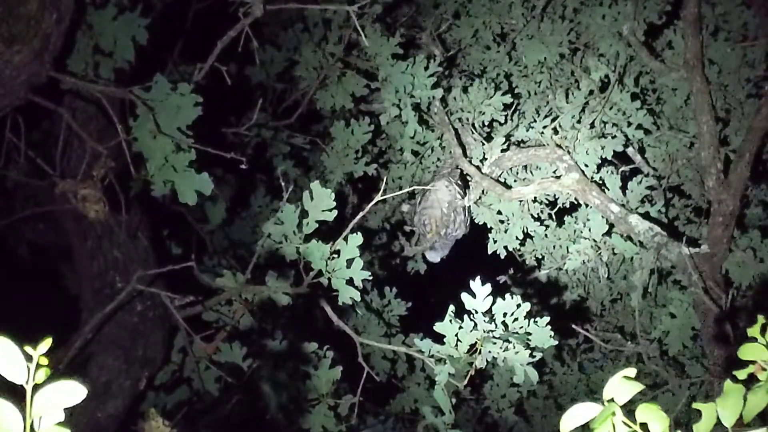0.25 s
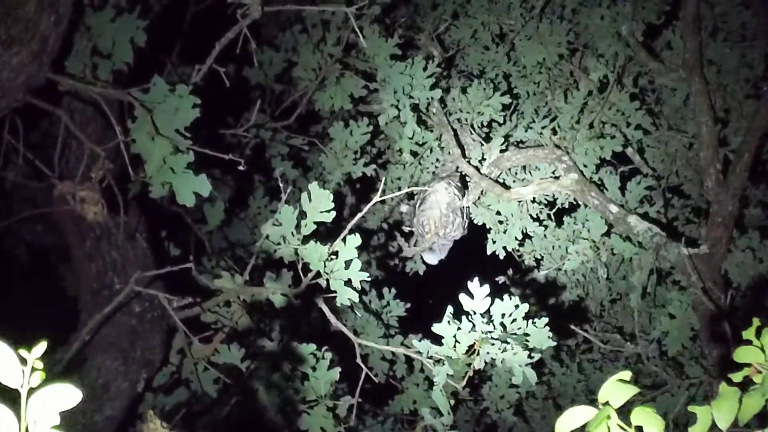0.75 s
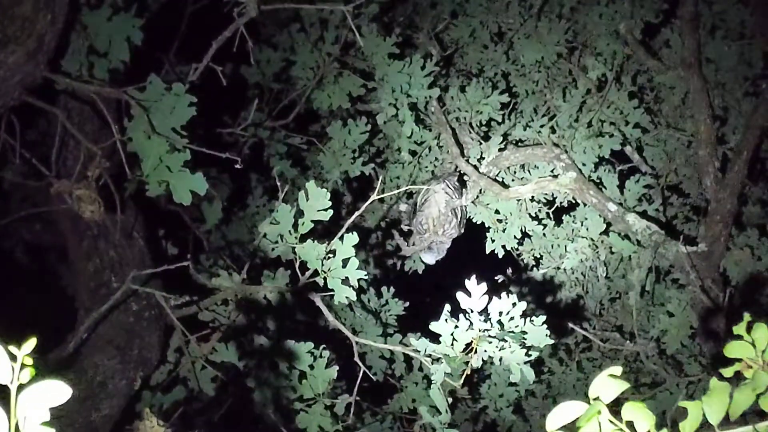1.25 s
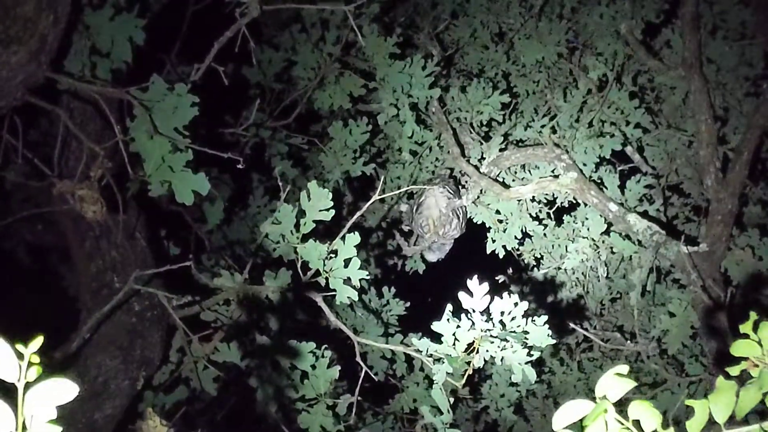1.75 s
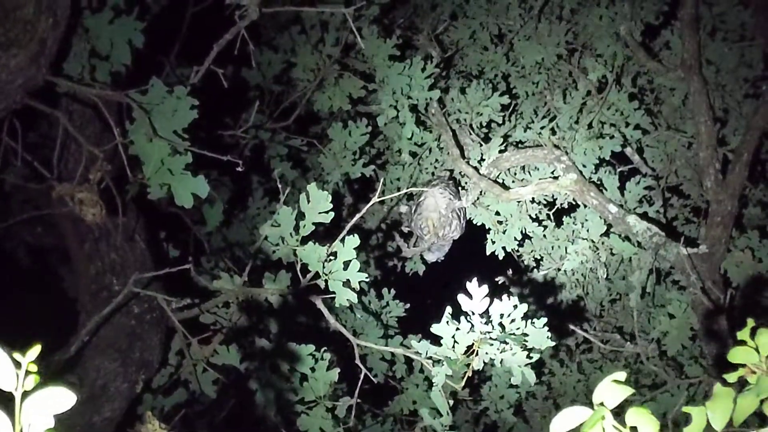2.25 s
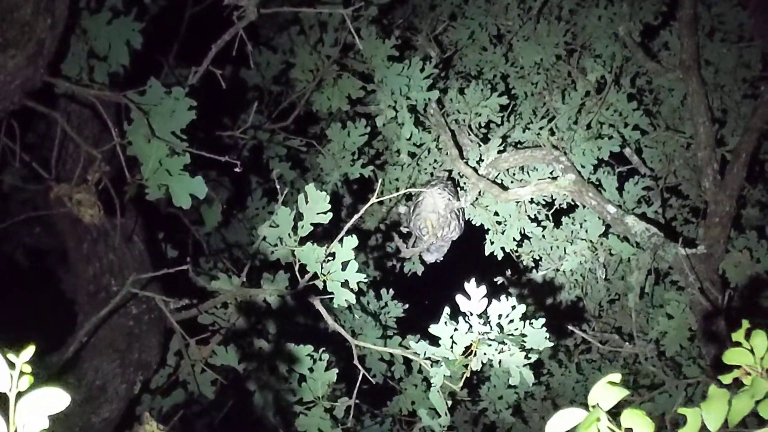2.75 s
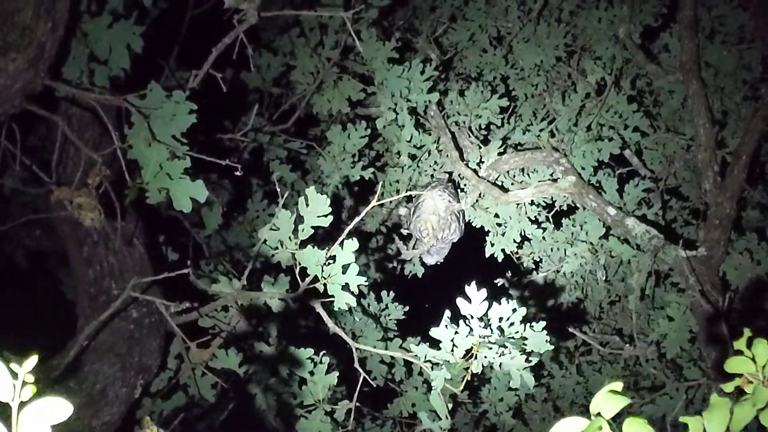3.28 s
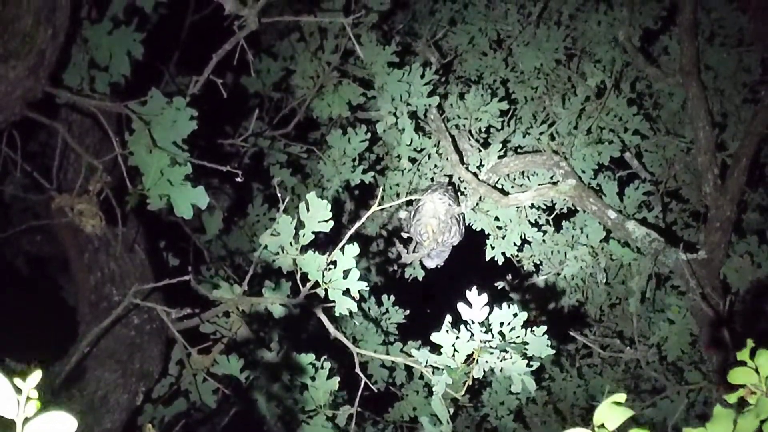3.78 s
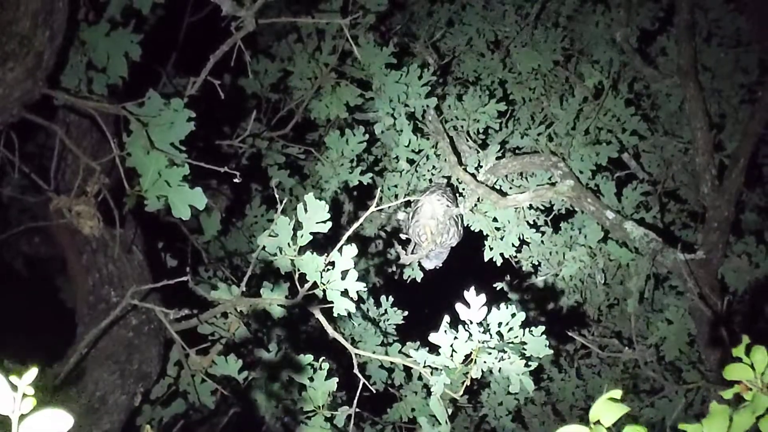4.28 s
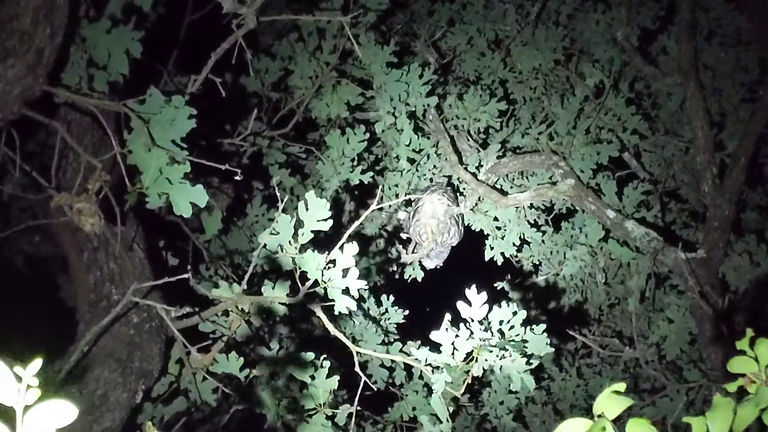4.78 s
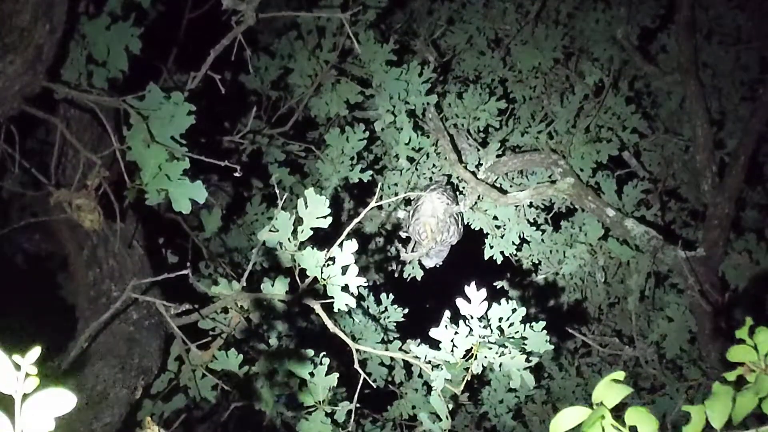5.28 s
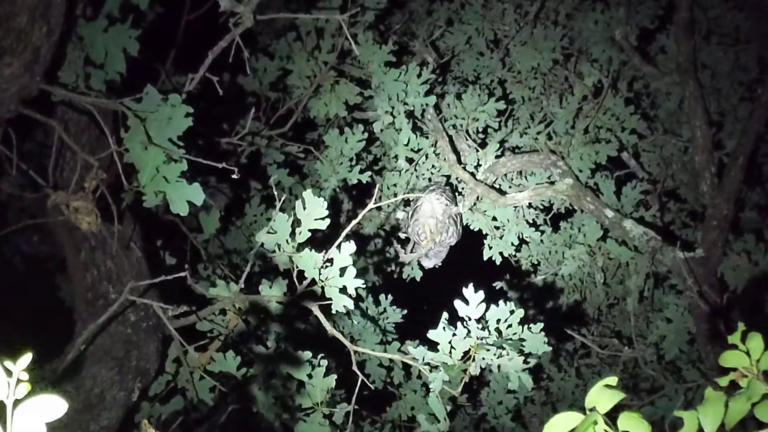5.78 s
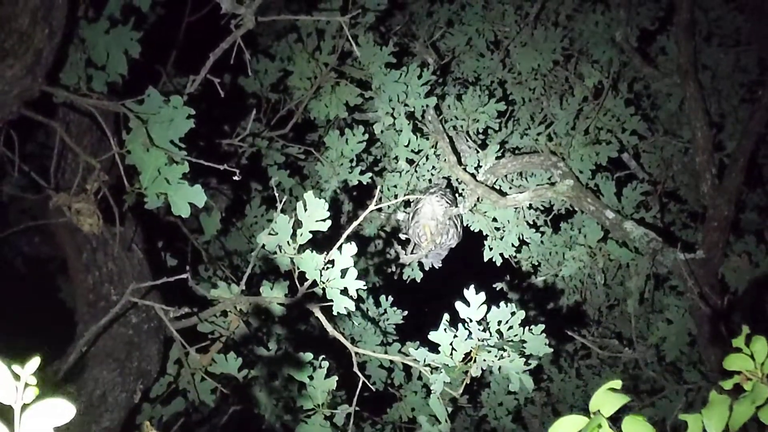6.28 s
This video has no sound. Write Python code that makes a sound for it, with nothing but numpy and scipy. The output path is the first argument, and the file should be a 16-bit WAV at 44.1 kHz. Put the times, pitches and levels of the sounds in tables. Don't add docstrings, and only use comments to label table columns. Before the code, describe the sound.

An owl gives three short hoots and one long hoot that breaks high and slides down, over steady night crickets in woods.

```python
import sys
import numpy as np
from scipy import signal
from scipy.fft import rfft, irfft, next_fast_len
from scipy.io import wavfile
from scipy.ndimage import uniform_filter1d, map_coordinates

SR = 44100
rng = np.random.default_rng(int(sys.argv[2]) if len(sys.argv) > 2 else 0)


def dump(signal):
    limited = np.clip(np.atleast_2d(signal).T, -1, 1)
    pcm = np.round(limited * 32767).astype(np.int16)
    wavfile.write(sys.argv[1], SR, pcm)


def boost_factor(decibels):
    exponent = np.asarray(decibels, float) / 20
    return 10 ** exponent


N = 287973
TIME = np.arange(N) / SR

# [t/s, chest part/s, high hold/s, top f/Hz, level/dB]
HOOTS = [
    (0.061, 0.076, 0.0038, 455.5, -34.5),
    (.385, 0.071, 0.016, 485.7, -34),
    (0.704, .069, .02, 502.6, -34),
    (0.894, .057, 0.0045, 521.5, -33.5),
]
# [share of its length, share of the climb to the top, effort level/dB]
CLIMB = [(0, 0.00096, -13.5), (.3, .27, -3), (.65, .44, -1), (1, .56, 0)]
# [t after the hold/s, f/Hz, effort level/dB]
SAG = [(.025, 297, -4), (.033, 268, 0.5), (.066, 195.3, -14.5)]
# [t/s, f/Hz, effort level/dB]
SLIDE = [(.995, 575, -3.5), (1.02, 581, -1.5), (1.1, 592, -3), (1.14, 544, -2), (1.158, 501.5, 3),
         (1.183, 455, 1), (1.194, 352.4, -1.5), (1.425, 259, -3.5), (1.51, 161.5, -18.5)]
SYRINX_DB = [0, -7, -12, -19]
CLEAR_DB = [0, -6.5, -5, -15]
# [f/Hz, level/dB]
THROAT_POUCH = [(200, -25.5), (280, -23.5), (330, -11.5), (400, -12.5), (460, -3), (580, 0.5), (680, -5.5),
                (770, -11)]
# [f/Hz, level/dB]
WINDPIPE = [(900, -5.5), (1020, -7.5), (1180, -10), (1330, -14), (1490, -7.5), (1750, -12), (2000, -6),
            (2250, -5)]
# [f/Hz, level/dB]
BEAK = [(900, 6), (1300, -5.5), (1600, 0), (2300, 5.5), (2800, -24), (4000, -34)]
# [t/s, length/s, level/dB]
PUFFS = [(0.064, 0.067, -54), (0.201, 0.028, -51), (0.39, 0.022, -51.5), (0.529, 0.034, -55),
         (0.706, 0.055, -56.5), (0.846, 0.076, -52.5), (1.461, 0.056, -54)]
# [f/Hz, level/dB]
THROAT_AIR = [(150, -71.5), (260, -8), (550, 3), (1250, -4.5), (1450, -35), (2300, -13.5), (2800, -37),
              (3600, -40), (6000, -61.5)]
# [t/s, length/s, level/dB]
WHEEZES = [
    (0.108, .05, -72.5),
    (0.426, 0.07, -74),
    (0.747, 0.0553, -72),
    (1.181, .1, -72.5),
]
# [f/Hz, level/dB]
NOSTRIL = [(6000, -25.5), (8500, -13), (9800, -2.5), (10500, -16), (11200, -3), (12500, -25)]

# [t/s, glide/s, held to/s, top f/Hz, level/dB]
STEEP_CHIPS = [
    (5.697, 0.018, .019, 3370, -40.5),
    (5.887, 0.019, 0.03, 3350, -38.5),
]
# [t/s, glide/s, held to/s, top f/Hz, level/dB]
FLAT_CHIPS = [
    (6.107, .016, 0.02, 3116, -40),
    (6.358, .029, 0.024, 3015, -41),
]
# [whistle f/Hz, level/dB]
CHIP_OCTAVE = [(2250, -10), (2900, -9.5), (3150, -19.5), (3340, -23)]
# [t/s, peak level/dB, middle f/Hz, rise to each side as share of f]
FAR_CHIPS = [(0.093, -69, 2730, 0.055), (0.545, -64, 2940, 0.055), (3.015, -69, 2770, 0.036),
             (3.0773, -57, 2750, 0.037), (3.107, -58.5, 2690, 0.068), (3.1352, -52, 2740, 0.023),
             (3.1695, -45, 3030, 0.063), (3.191, -57, 2840, 0.05), (3.2205, -59, 2950, 0.054)]

# [t/s, peak level/dB]
CHIRPS = [(0.2009, -57.5), (0.4161, -57), (0.6647, -57), (0.8837, -52.5), (1.1296, -53), (1.3549, -54),
          (1.5816, -51), (1.7987, -53.5), (2.0148, -53), (2.2408, -56.5), (2.4626, -54), (2.6793, -52),
          (2.888, -57.5), (3.1058, -54), (3.326, -54), (3.5426, -58), (3.773, -55), (3.9983, -56),
          (4.2226, -56), (4.4476, -54), (4.6695, -53), (4.8881, -54), (5.1178, -53), (5.3503, -53),
          (5.58, -55), (5.8112, -54), (6.0325, -56), (6.2574, -55.5), (6.48, -88)]
# [delay/s, length/s, f/Hz, level/dB]
STROKES = [
    (0, .01, 3870, -2.5),
    (.02, .019, 4080, -1),
    (.045, .021, 4110, 1.5),
    (.075, .016, 4110, -3),
    (.1, .016, 4110, -14),
]
# [t/s, level/dB]
TICKS = [(0.1855, -70), (0.432, -68), (0.7173, -69), (0.974, -68), (1.2646, -71), (1.6985, -70),
         (1.9152, -67), (2.1281, -74), (2.355, -73), (2.5995, -70), (2.8255, -69), (3.0584, -72),
         (3.2894, -69.5), (3.5339, -71), (3.7663, -71), (4.0028, -68), (4.6912, -76), (4.9347, -71),
         (5.1507, -67.5), (5.3772, -71), (5.682, -73), (5.9818, -70), (6.2173, -71), (6.4497, -68)]
# [t/s, length/s, level/dB]
FALTERS = [
    (1.9, 0.24, -4),
    (5.47, .2, -1.5),
]
# [t/s, length/s, level/dB]
LISPS = [
    (2.478, 0.077, -70),
    (2.53, .1, -75),
    (4.996, 0.075, -68.5),
    (5.06, 0.036, -77),
    (5.44, 0.18, -80),
]
# [f/Hz, level/dB]
RASP = [(8000, -38), (10000, -5), (11700, 2), (13000, -5.5), (14500, -1), (16000, -21)]
# [f/Hz, band width/Hz, stroke rate/Hz, level/dB]
CHORUS = [(2556, 186, 60, -75), (2736, 240, 35, -81), (3006, 230, 20, -79), (3100, 480, 42, -83.5),
          (3500, 82, 43, -78), (5510, 1050, 56, -79), (11820, 400, 38, -87.5)]
# [t/s, length/s, level/dB]
CROAKS = [(1.665, 0.13, -76), (1.793, 1.5, -84.5), (4.243, 0.31, -82), (4.558, 0.31, -79), (4.8, 0.95, -86),
          (5.702, 0.19, -87), (6.17, .12, -81), (6.3, 0.29, -83)]

# [f/Hz, time to fall 60 dB/s]
WOODS = [(200, 0.76), (600, 0.73), (3000, 0.51), (10000, 0.11)]
# [f/Hz, level per Hz/dB]
TRAFFIC = [(12, -42.5), (20, 1.5), (43, -8.5), (79, -5), (146, -18), (208, -16.5), (329, -19), (573, -7.5),
           (685, -16), (787, -14), (1100, -26), (1580, -23), (2040, -29), (2300, -25), (2990, -53),
           (5060, -120)]
# [f/Hz, correlation]
ALIKE = [(30, 0.98), (90, 0.94), (180, 0.00029), (500, 0), (2000, 0), (6000, 0.15)]
# [f/Hz, level per Hz/dB]
HISS = [(1500, -46), (2300, -11.5), (3300, 6.5), (4200, 5), (4650, -4.5), (5100, -0.5), (6500, -6.5),
        (7600, -4), (10900, -9), (15700, -10)]


def owl():
    hoots = [hoot_track(*hoot) for hoot in HOOTS]
    voices = [voice(rows, count=9, slope_db=-5.5, jitter=0.0018, shimmer_db=0.71, mouth=BEAK)
              for rows in hoots]
    tones, efforts = zip(*voices)
    puffs = np.zeros(N)
    for s, length, db in PUFFS:
        add(puffs, s, boost_factor(db) * np.linspace(1, 0, int(length * SR)))
    air = (boost_factor(-40) * sum(efforts) ** 0.5 + puffs) * coloured(THROAT_AIR)[0]
    wheeze = np.zeros(N)
    for s, length, db in WHEEZES:
        add(wheeze, s, boost_factor(db) * np.hanning(int(length * SR)))
    air += wheeze * coloured(NOSTRIL)[0]
    return placed(sum(tones) + air, -.3, lag=5, early_db=-16, late_db=-17)


def hoot_track(s, chest, hold, top_hz, db):
    low_hz, leap_s = 205.6, .017
    top = s + chest + leap_s
    rows = [(s + u * chest, low_hz + up * (top_hz - low_hz), effort) for u, up, effort in CLIMB]
    rows += [(top, top_hz, 0), (top + hold, top_hz, 0)]
    if s == HOOTS[-1][0]:
        rows += list(SLIDE)
    else:
        rows.append((top + hold + 0.0159, .79 * top_hz, 0))
        rows += [(top + hold + late, hz, effort) for late, hz, effort in SAG]
    at, hz, effort = np.transpose(rows)
    t = np.arange(at[0], at[-1], .001)
    hz, effort = np.interp(t, at, hz), db + np.interp(t, at, effort)
    clear = np.clip((hz - 386) / 70, 0, 1)
    brighter = .45 * (db - HOOTS[0][-1])
    tract = list(THROAT_POUCH) + list(WINDPIPE)
    track = [t, hz]
    for k, source in enumerate(SYRINX_DB):
        track.append(effort + source + clear * CLEAR_DB[k] + brighter * k + along(tract, (k + 1) * hz))
    return np.transpose(track)


def chips():
    steep = whistles(STEEP_CHIPS, low_hz=2203, bend=0.69, start_db=-22.5, fade_db_per_s=1500,
                     third_db=-31.5, third_fades_db=4)
    flat = whistles(FLAT_CHIPS, low_hz=2645, bend=1.8, start_db=-9, fade_db_per_s=1900,
                    third_db=-13.5, third_fades_db=-17.5)
    ring = [.3, .7, .7, .3, -.3, -.7, -.7, -.3]
    for s, db in [(5.705, -56), (5.895, -59)]:
        click = np.convolve(rng.standard_normal(407), ring, "valid")
        add(steep, s, boost_factor(db - 60 * TIME[:400] / .012) * click)
    far = np.zeros(N)
    for s, db, hz, rise in FAR_CHIPS:
        add(far, s, boost_factor(db) * stroke(0.011, hz, rise, second_db=-8))
    near = placed(steep, 6, lag=29, early_db=-10, late_db=-18)
    near = near + placed(flat, .2, lag=15, early_db=-11, late_db=-18)
    return near + placed(far, 7.4, lag=-19, early_db=-6, late_db=-13)


def whistles(rows, low_hz, bend, start_db, fade_db_per_s, third_db, third_fades_db):
    out, t = 0, np.arange(0, .045, .001)
    attack_s = 0.011
    for s, glide, held, top_hz, db in rows:
        up = np.clip(t / glide, 0, 1) ** bend
        hz = low_hz + up * (top_hz - low_hz)
        level = db + start_db * np.clip(1 - t / attack_s, 0, 1) - fade_db_per_s * np.clip(t - held, 0, 1)
        second = level + along(CHIP_OCTAVE, hz)
        third = level + third_db + third_fades_db * up
        track = np.transpose([s + t, hz, level, second, third])
        out = out + voice(track, count=4, slope_db=-14, jitter=0.0025)[0]
    return out


def field_cricket():
    out = np.zeros(N)
    for s, db in [(-0.0166, -56.5)] + list(CHIRPS):
        chirp_db = .3 * (db + 56) - 56.5
        for delay, length, hz, level in STROKES:
            late, size, tune = rng.standard_normal(3)
            both_wings = delay > 0
            wings = stroke(length, hz * (1 + .004 * tune), .014, -30)
            wings = wings + .75 * both_wings * stroke(length, hz - 135 + 35 * size, .014, -30)
            start = s - .002 + delay + .0012 * late * both_wings
            add(out, start, boost_factor(chirp_db + level + .8 * size) * wings)
    out *= boost_factor(3 * wobble(250))
    return placed(out, -2.5, lag=35, early_db=-5, late_db=-11)


def second_cricket():
    out = np.zeros(N)
    for s, db in TICKS:
        for lead_s, lead_db in [(0, 0), (.0215, -3)]:
            tick = stroke(0.0089, 4305, 0.0046, second_db=-8.5)
            add(out, s - lead_s - .004, boost_factor(db + lead_db + 3) * tick)
    return placed(out, -2.2, lag=-11, early_db=0, late_db=1)


def tree_cricket():
    level = -76 + 1.8 * wobble(3)
    for s, length, db in FALTERS:
        add(level, s, db * np.hanning(int(length * SR)))
    beat = 2 * np.pi * np.cumsum(52.6 + .2 * wobble(2)) / SR
    strokes = 1 + .55 * np.sin(beat) + .4 * np.sin(2 * beat + 1)
    tone = np.sin(2 * np.pi * np.cumsum(5395 + 70 * wobble(200)) / SR)
    trill = boost_factor(level + 2 * wobble(60) + wobble(9)) * unit(strokes * tone)
    return placed(trill, -3.5, lag=-8, early_db=-6, late_db=-7)


def katydid():
    swell = np.zeros(N)
    for s, length, db in LISPS:
        add(swell, s, boost_factor(db) * np.sqrt(np.hanning(int(length * SR))))
    return swell * coloured(RASP, channels=2) * boost_factor([[2], [-2]])


def chorus():
    out = 0
    for hz, width, rate, db in CHORUS:
        band = noise_band(hz, width)
        band[1] = 0.23 * np.roll(band[0], 36) + 1.02 * band[1]
        throb = 1 + .3 * np.sin(2 * np.pi * np.cumsum(rate * (1 + .05 * wobble(1.5))) / SR)
        out = out + boost_factor(db + 1.2 * wobble(3) + 1.8 * wobble(12)) * unit(band * throb)
    return out * boost_factor([[1.5], [-1.5]])


def pond():
    swell = np.full(N, boost_factor(-91.5))
    for s, length, db in CROAKS:
        add(swell, s, boost_factor(db) * np.sqrt(np.hanning(int(length * SR))))
    band = noise_band(1560, 260)
    return swell * boost_factor(2.9 * wobble(20)) * unit(band + 0.22 * band[::-1])


def night_floor():
    turn = lambda hz: np.arccos(np.clip(along(ALIKE, hz), -1, 1)) / 2
    widen = lambda hz: np.array([np.cos(turn(hz)), np.sin(turn(hz))])
    mid, side = filtered(coloured(TRAFFIC, channels=2), widen)
    hum = boost_factor(-67.5) * unit(np.array([mid + side, mid - side]))
    bass = filtered(hum, lambda hz: 1 / (1 + (hz / 130) ** 4))
    bass_gusts_db = 0.5 * wobble(1.5) + wobble(6)
    upper_gusts_db = .4 * wobble(2) + .8 * wobble(8)
    hum = boost_factor(bass_gusts_db) * bass + boost_factor(upper_gusts_db) * (hum - bass)
    hiss_db = -69.5 + 0.47 * wobble(9) + 0.93 * wobble(6.1)
    return hum + boost_factor(hiss_db) * coloured(HISS, channels=2) * boost_factor([[2], [-2]])


def placed(x, pan_db, lag, early_db, late_db):
    direct = np.array([np.roll(x, lag) * boost_factor(pan_db / 2), x * boost_factor(-pan_db / 2)])
    hz, t, z = signal.stft(rng.standard_normal((2, SR)), SR, nperseg=256)
    decay = boost_factor(-60 * t / along(WOODS, hz)[:, None])
    late = signal.istft(z * decay, SR, nperseg=256)[1]
    n = SR // 10
    branches = rng.random((2, n)) < .01
    early = rng.standard_normal((2, n)) * branches * boost_factor(-60 * TIME[:n] / 0.11)
    late = boost_factor(late_db) * late / np.linalg.norm(late[0])
    late[:, 200:200 + n] += boost_factor(early_db) * early / np.linalg.norm(early, axis=1)[:, None]
    return direct + signal.fftconvolve(x[None], late, axes=1)[:, :N]


def voice(rows, count, slope_db, jitter, shimmer_db=0, mouth=((1, 0), (2, 0))):
    s, hz, *levels = np.transpose(rows)
    given = len(levels)
    gate = np.clip(np.minimum(TIME - s[0], s[-1] - TIME) / .004 + .5, 0, 1)
    t, out = TIME[gate > 0], np.zeros((2, N))
    window = max(int(30000 / hz.mean() * 3), 1)
    smooth = lambda v: uniform_filter1d(np.interp(t, s, v), window)
    pitch = smooth(hz)
    phase = 2 * np.pi * np.cumsum(pitch * (1 + jitter * wobble(90, t))) / SR
    levels = [smooth(v) for v in levels]
    last = levels[-1]
    for k in range(given, count):
        levels.append(last + slope_db * (k - given + 1) + along(mouth, (k + 1) * pitch))
    tone = 0
    for k, db in enumerate(levels):
        shimmer = shimmer_db * k * wobble(69.55, t)
        tone = tone + boost_factor(db + 5.5 + shimmer) * np.sin((k + 1) * phase + k)
    overtones = np.sqrt(sum(boost_factor(db) ** 2 for db in levels[1:]))
    out[:, gate > 0] = tone, overtones
    return gate * out


def stroke(length, hz, rise, second_db):
    u = np.arange(int(length * SR)) / (length * SR)
    phase = 2 * np.pi * hz * length * (u + rise * (u * u - u))
    return np.sqrt(np.sin(np.pi * u)) * (np.sin(phase) + boost_factor(second_db) * np.sin(2 * phase))


def unit(x):
    return x / np.sqrt(np.mean(x ** 2) + 1e-20)


def along(points, hz):
    f, v = np.transpose(points)
    return np.interp(np.log(hz + 1), np.log(f + 1), v)


def wobble(rate, t=TIME):
    return map_coordinates(rng.standard_normal(int(N * rate / SR) + 4), [t * rate])


def filtered(x, response):
    m = next_fast_len(N + 8192)
    return irfft(rfft(x, m) * response(np.fft.rfftfreq(m, 1 / SR)), m)[..., :N]


def coloured(spectrum, channels=1):
    points = [(1, -120)] + list(spectrum)
    return unit(filtered(rng.standard_normal((channels, N)), lambda hz: boost_factor(along(points, hz))))


def noise_band(center_hz, width_hz):
    bell = lambda f: np.exp(-((f - center_hz) / width_hz) ** 2 * 2)
    return filtered(rng.standard_normal((2, N)), bell)


def add(track, s, sound):
    i = round(s * SR)
    part = track[max(i, 0):max(i + len(sound), 0)]
    part += sound[max(-i, 0):][:len(part)]


def scene():
    near = owl() + chips() + field_cricket() + second_cricket() + tree_cricket() + katydid()
    return near + chorus() + pond() + night_floor()


def roll_off(x):
    return signal.sosfilt(signal.butter(12, 15890, fs=SR, output="sos"), x)


def record(dry):
    mix = filtered(dry, lambda hz: hz < 15760)
    return roll_off(mix)


dry = scene()
out = record(dry)
dump(out)
```